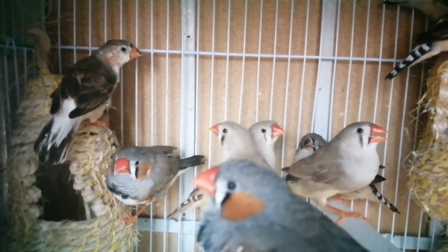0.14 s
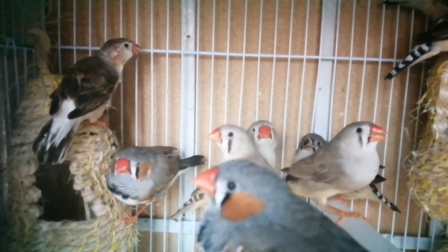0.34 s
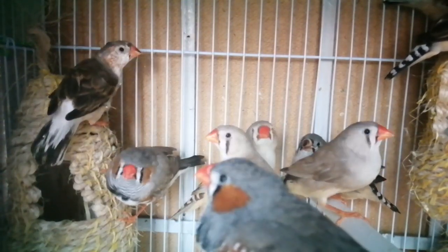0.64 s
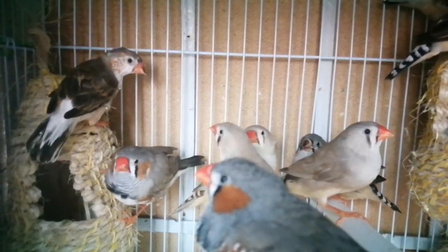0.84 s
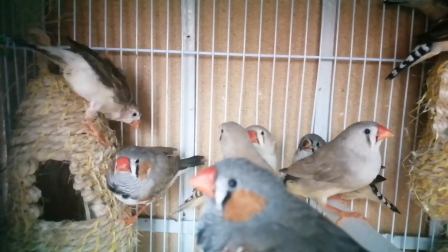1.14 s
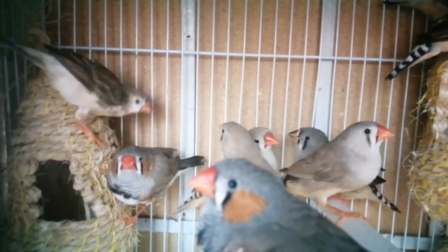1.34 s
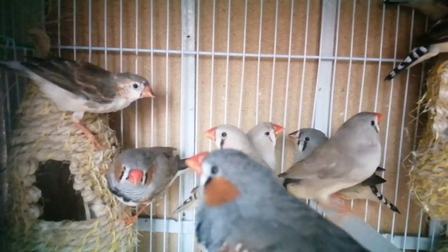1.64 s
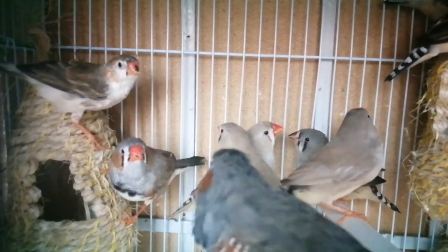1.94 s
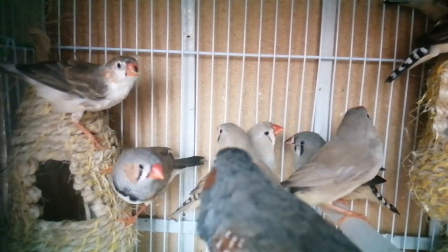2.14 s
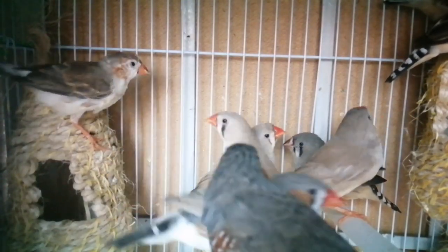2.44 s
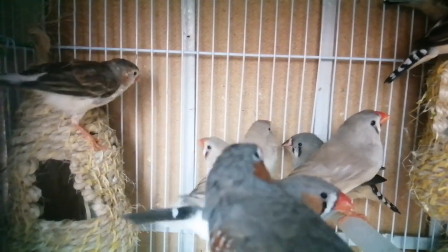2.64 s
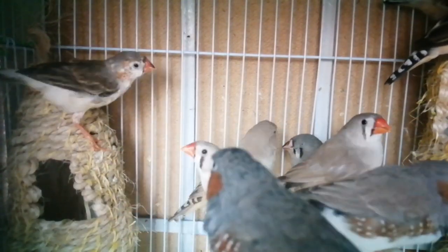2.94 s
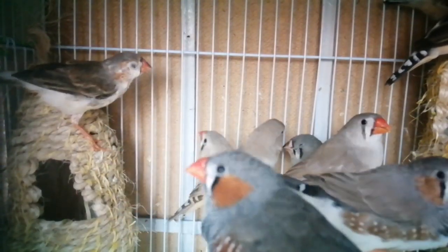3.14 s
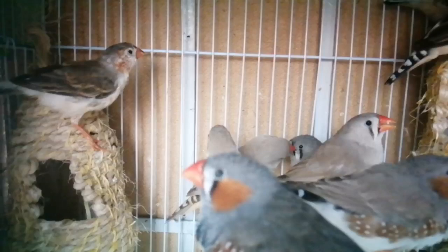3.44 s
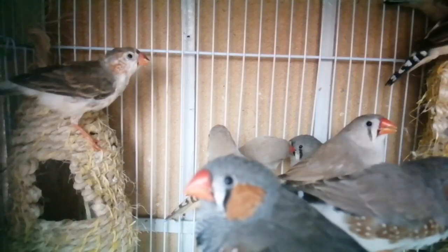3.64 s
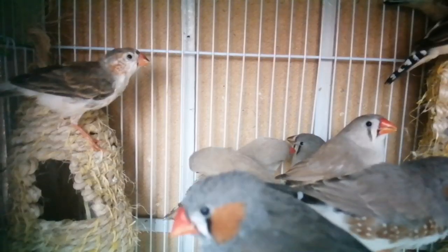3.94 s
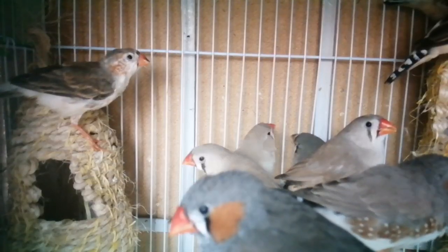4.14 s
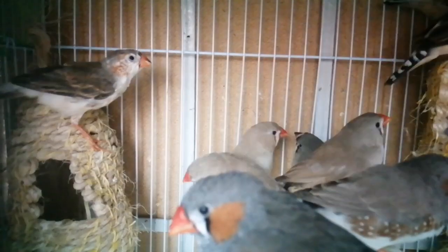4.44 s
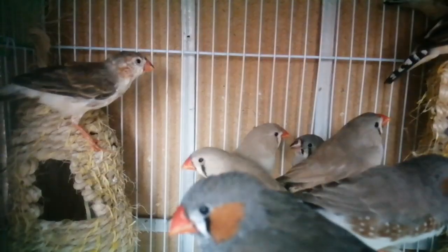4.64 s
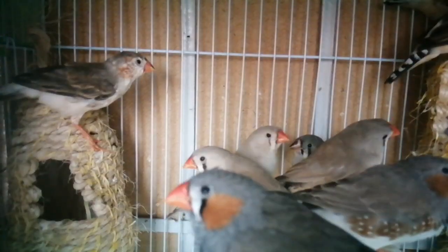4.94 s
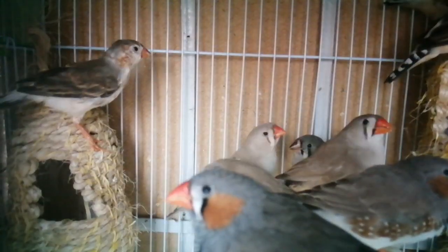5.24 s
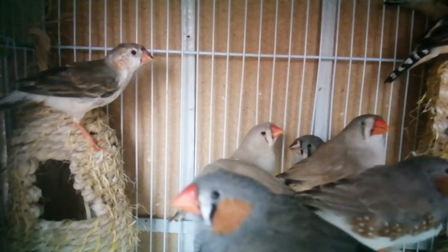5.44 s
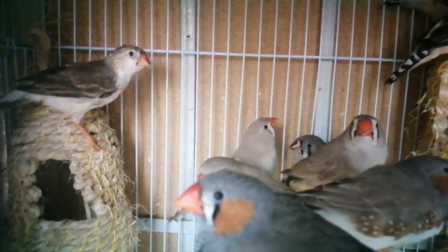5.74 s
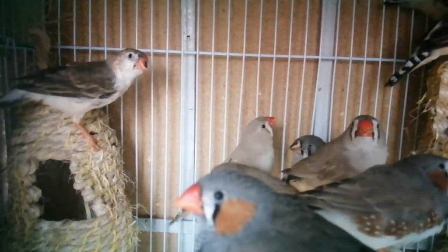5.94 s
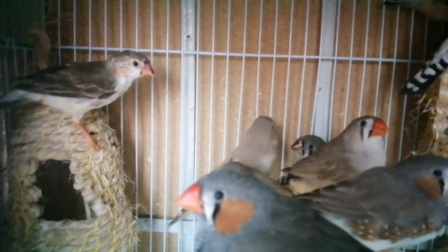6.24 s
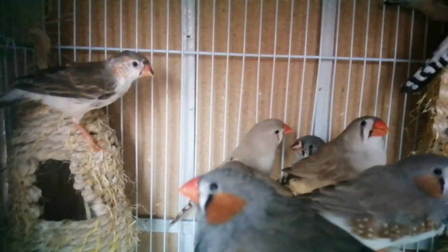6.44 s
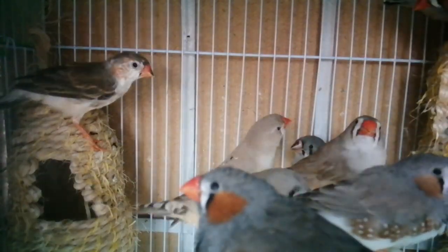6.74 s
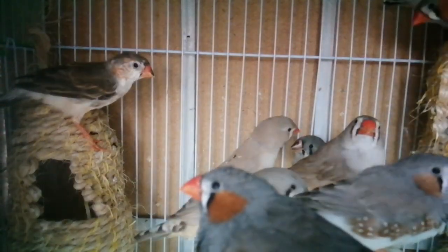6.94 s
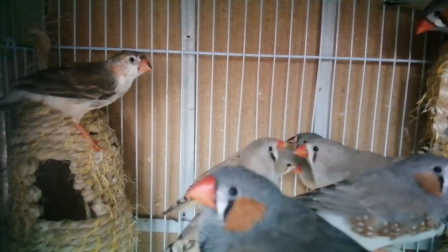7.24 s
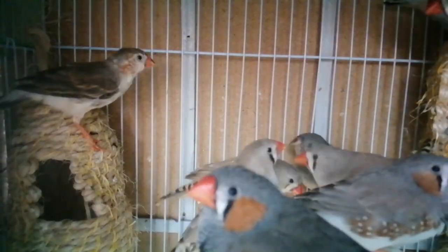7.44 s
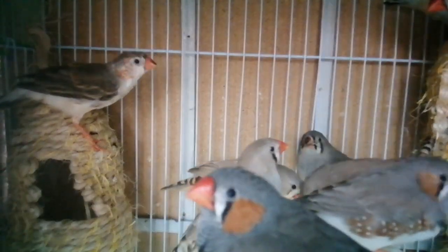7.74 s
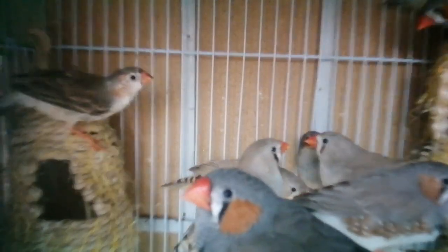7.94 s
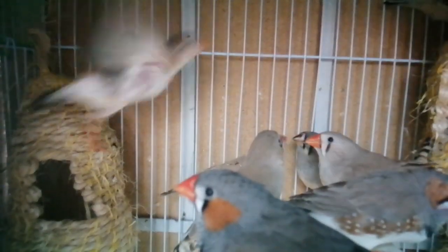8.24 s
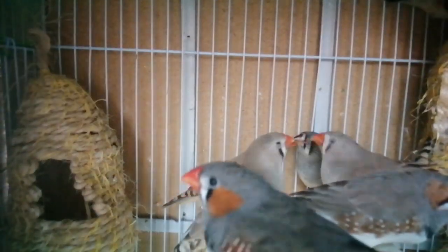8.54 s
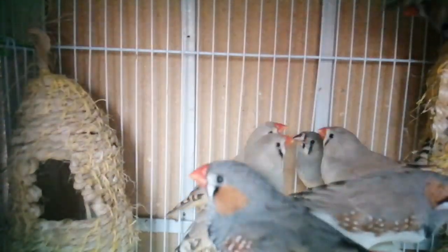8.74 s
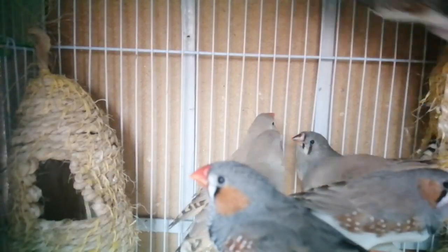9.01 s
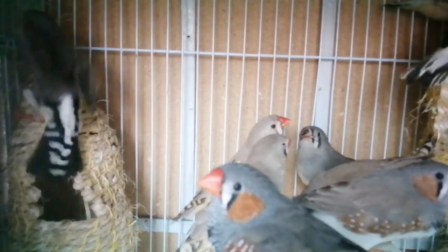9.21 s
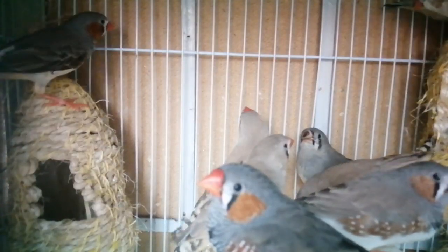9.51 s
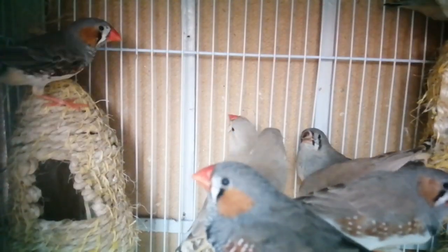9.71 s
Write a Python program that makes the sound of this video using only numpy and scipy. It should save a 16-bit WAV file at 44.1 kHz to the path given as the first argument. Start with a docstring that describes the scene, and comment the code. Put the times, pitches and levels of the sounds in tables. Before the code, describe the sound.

Small finches call in a wire cage, close to the microphone, over a dull outdoor rumble and a low, wavering motor hum. Farther birds peep faintly throughout. At 0.35 seconds a loud, sharp chip starts a high, quick trill of about twelve notes, sinking slightly in pitch until 1.6. Several softer, short nasal calls follow from 1.4 to 2.9. Around 3.6 the hum swells and the close bird gives a chip and a brief up-and-down whistle. Claws scratch sharply on a perch at 3.8 and 4.0. A quieter stretch holds light feather brushes and a dull board knock at 5.4. Two loud chips at 6.8 lead into a second trill, falling and fading by 8.1, with a sharp claw scratch at 7.6 and a soft knock near 8. Light claw ticks and feather rustles continue until almost 10 seconds.

```python
"""Finches trill, chip and call in a wire cage with a board back. One close bird trills twice and whistles;
each trill syllable comes from the two sides of its syrinx. Its mates give nasal calls, partials shaped by
throat and beak; farther birds sweep and peep. Claws tick on perch and wire, feathers brush, the board
knocks. A motor hums in a dull outdoor rumble. The recorder turns its gain down under the loudest calls."""
import sys
import numpy as np
from scipy import signal
from scipy.fft import rfft, irfft, next_fast_len
from scipy.io import wavfile
from scipy.ndimage import uniform_filter1d

SR = 44100
rng = np.random.default_rng(int(sys.argv[2]) if len(sys.argv) > 2 else 0)


def master(y):
    """Save y as 16-bit WAV."""
    cut = np.clip(np.atleast_2d(y).T, -1, 1)
    pcm = np.round(cut * 32767)  # scale
    wavfile.write(sys.argv[1], SR, pcm.astype(np.int16))


N = 435266

# outdoor rumble, also the puff of a touch: f/Hz, density/dB
RUMBLE_SPECTRUM = [(12, -40), (20, -18), (43, 1.5), (195, -7.5), (242, -8), (380, -13.5), (642, -15.5),
                   (955, -19), (1500, -22.5), (1950, -67.5), (3300, -120)]


def near_birds():
    """One bird trills in two overlapping voices and whistles; it and a neighbour give short rising chips."""
    # trill syllables: t/s, lower voice f/Hz, level/dB
    syllables = [(0.4298, 5540, 6.5), (.523, 5580, 4.5), (0.6192, 5476, 5), (0.714, 5436, 2.5),
                 (.812, 5340, 1.5), (.911, 5340, 2), (1.015, 5230, 3), (1.115, 5210, 3), (1.218, 5274, 1),
                 (1.32, 5180, 2), (1.422, 5090, 1), (1.541, 5046, 6), (6.937, 5313, 3), (7.036, 5455, 2.5),
                 (7.129, 5290, 4.5), (7.225, 5410, 2.5), (7.325, 5310, 1), (7.424, 5310, 0),
                 (7.525, 5270, 0), (7.63, 5170, -1.5), (7.738, 5180, -2.5), (7.842, 5070, -5.5),
                 (7.953, 4866, -8), (8.07, 4870, -10.5)]
    # single chips of both birds: t/s, level/dB, end f/Hz, pan/dB, length/s
    chips = [(0.346, 17.5, 5384, 1, 0.019), (0.358, 0.5, 6350, 3.5, 0.028), (0.966, -8.5, 6220, 11, 0.05),
             (1.509, -5.5, 6360, 3, 0.026), (1.601, 0.5, 6130, 4, 0.026), (1.699, -4.5, 6110, 7.5, 0.025),
             (1.789, -4.5, 5810, 0.5, 0.036), (1.908, -4, 5640, 6, 0.023), (3.625, 5, 5540, -2, 0.025),
             (6.779, 11.5, 5150, -3, 0.04), (6.857, 10.5, 5100, 1, 0.038)]
    # whistle contour: t/s, f/Hz, level/dB
    whistle = [(3.637, 4670, -8.5), (3.661, 4780, -1.5), (3.67, 4930, 2.5), (3.688, 6020, -3),
               (3.706, 6074, 4.5), (3.719, 5970, -9.5), (3.727, 5230, -5.5), (3.742, 4910, -6.5),
               (3.75, 5200, -2), (3.759, 5900, -3.5), (3.767, 5920, -2.5), (3.774, 5920, -26.5)]
    # partials of each voice: multiple of pitch, level/dB
    upper_partials = [(.5, -25), (1, 0), (1.5, -14), (2, -9), (2.5, -25)]
    lower_partials = [(.5, -43.5), (1, -3), (2, -17)]
    whistle_partials = [(.5, -21.5), (1, -2), (1.5, -17), (2, -15.5)]
    out = np.zeros((2, N))
    for s, low_hz, db in syllables:
        hz, shape = rising_note(1.115 * low_hz, 0.031, dip=rng.uniform(0.05, 0.132),
                                rise_s=0.00303, swell=0.9, edge=0.7)
        upper = syrinx(hz, amp(db - 12) * shape, upper_partials, pan_db=3, rough=0.33, broken=0.17)
        add(out, s - 0.004, upper)
        hz, shape = rising_note(1.008 * low_hz, rng.uniform(0.033, 0.034), dip=rng.uniform(0.1, 0.2),
                                rise_s=0.00307, swell=1.36, edge=0.39)
        hz = hz * np.linspace(0.99, 1.01, len(hz))
        lower = syrinx(hz, amp(db - 5) * shape, lower_partials, pan_db=6.5, rough=0.07, broken=0.5)
        add(out, s + 0.012, lower)
    for s, db, end_hz, pan_db, length_s in chips:
        high = end_hz > 5400
        partials, rough, rise_s = (upper_partials, 0.19, 0.003) if high else (lower_partials, 0.11, 0.007)
        hz, shape = rising_note(end_hz, length_s, dip=0.14, rise_s=rise_s, swell=0.73, edge=0.83)
        add(out, s - 0.002, syrinx(hz, amp(db - 9.5) * shape, partials, pan_db, rough, broken=0.48))
    s, hz, db = np.transpose(whistle)
    t = np.arange(s[0], s[-1], 1 / SR)
    rough = np.interp(t, [3.715, 3.725], [0.03, 0.09])   # fall and second rise are hoarser
    glide_hz = uniform_filter1d(np.interp(t, s, hz), size=300)
    level = np.minimum(1, (t - s[0]) / 0.0032) * amp(np.interp(t, s, db))
    add(out, s[0], syrinx(glide_hz, level, whistle_partials, pan_db=1.4, rough=rough, broken=rough))
    return out


def syrinx(hz, level, partials, pan_db, rough, broken):
    """One side of the syrinx: rough shakes pitch and level fast, broken makes it swell and drop out."""
    n = len(hz)
    shaken_hz = hz * (1 + 0.06 * rough * drift(550, n))
    phase = 2 * np.pi * (np.cumsum(shaken_hz) / SR + rng.random())
    flutter = 0.5 + 2.6 * rough * drift(350, n)
    level = level * rms_one(flutter * (1 + broken * drift(73.7, n)))
    out = 0
    for k, db in partials:
        lead_rad = rng.normal(1.59, 0.51 * k)   # phase between the two microphone ports
        out = out + panned(level * amp(db), pan_db) * np.sin(k * phase + [[0], [lead_rad]])
    return out


def rising_note(hz, length_s, dip, rise_s, swell, edge):
    """Pitch climbing towards hz, and its envelope; more swell delays the top, more edge softens the ends."""
    t = np.arange(int(length_s * SR)) / SR
    return hz * (1 - dip * np.exp(-t / rise_s)), np.sin(np.pi * (t / length_s) ** swell) ** edge


def nasal_calls():
    """Arched stacks of partials, strongest near the throat and beak resonances; the lowest hardly radiate."""
    # calls: t/s, length/s, top f/Hz, start dip/0-1, end dip/0-1, level/dB, throat f/Hz, throat width/Hz,
    # partials below throat/dB, beak re throat/dB, pan/dB, roughness/0-1
    calls = [(1.412, 0.13, 684, 0.2, 0.09, -33.5, 2960, 380, -21.5, -3, -2, 0.44),
             (1.797, 0.1, 675, 0.3, 0.05, -25, 3600, 710, -27, 4, -8.5, 0.13),
             (1.95, 0.115, 659, 0.3, 0.05, -17.5, 4000, 900, -30, 7, -3, 0.35),
             (1.97, 0.11, 705, 0.2, 0.08, -23, 2800, 398, -17, -9.5, 1.5, 0),
             (2.071, 0.12, 693, 0.06, 0.1, -23.5, 3080, 400, -17, -40, -0.5, 0.09),
             (2.266, 0.1, 648, 0.15, 0.06, -17.5, 4150, 1100, -32, 4, -1.5, 0.16),
             (2.667, 0.2, 699, 0.14, 0.06, -22.5, 2865, 384, -12.5, -20, 5, 0.09),
             (6.671, 0.069, 531, 0.04, 0.06, -30.5, 2780, 600, -30, -20, -3, 0.16)]
    beak_hz, beak_width_hz, rolloff_hz = 5070, 380, 5900
    k = np.arange(1, 24)[:, None]
    out = np.zeros((2, N))
    for (s, length_s, top_hz, start_dip, end_dip, db,
         throat_hz, width_hz, low_db, beak_db, pan_db, rough) in calls:
        n = int(length_s * SR)
        t = np.arange(n) / SR
        along = t / length_s
        arch = 1 - start_dip * np.exp(-(t / 0.024) ** 1.6) - end_dip * along ** 3.9
        hz = k * top_hz * arch * (1 + (0.0022 + 0.01 * rough) * drift(250, n))   # a row per partial
        opening = 1 + 0.08 * np.exp(-t / 0.029) + 0.12 * along ** 3   # throat rings higher at both ends
        throat = 1 / np.hypot(1, 2 * (hz - throat_hz * opening) / width_hz) ** 1.62
        throat += amp(low_db) * (hz / throat_hz) / (1 + (hz / throat_hz) ** 6)
        beak = amp(beak_db) / np.hypot(1, 2 * (hz - beak_hz) / beak_width_hz)
        floor = amp(-31.5 + 16 * rough + beak_db / 2)
        wander_db = 2.6 * np.array([drift(13.2, n) for _ in k])
        gains = ((throat + beak) / (1 + (hz / rolloff_hz) ** 14) + floor) * amp(wander_db)
        ends = 1 + 2.1 * np.exp(-t / 0.015) + 2.1 * along ** 8
        hoarse = 1.2 * rough * ends * np.minimum((k / 7) ** 1.2, 3)
        rasp = (1 + hoarse * np.array([drift(500, n) for _ in k])) / np.sqrt(1 + hoarse ** 2)
        gains = gains / np.sqrt(np.sum(gains ** 2, axis=0) / 2) * (k > 1) * rasp
        phases = 2 * np.pi * np.cumsum(hz, axis=1) / SR + 6 * rng.random(k.shape)
        leads_rad = 0, rng.normal(1.78, 1, k.shape)
        stack = [np.sum(gains * np.sin(phases + lead), axis=0) for lead in leads_rad]
        shape = np.sin(np.pi * along ** 1.75) ** 0.19
        add(out, s, panned(shape * amp(db), pan_db) * stack)
    return out


def far_birds():
    """Short broken sweeps and peeps with a weak octave, panned at random; faint chatter at chance times."""
    # falling sweeps and slightly rising peeps: t/s, length/s, start f/Hz, level/dB
    sweeps = [(.005, 0.035, 3065, -48.5), (.184, 0.043, 3620, -52.5), (2.426, 0.032, 3260, -41),
              (2.472, 0.014, 4220, -41), (2.486, 0.055, 3925, -41), (2.516, 0.024, 3700, -50),
              (2.728, 0.048, 5740, -47), (2.991, 0.033, 3860, -49), (3.045, 0.02, 3610, -47),
              (3.085, 0.026, 2640, -47.5), (.49, 0.0204, 2930, -52), (.535, 0.0214, 2973, -59),
              (1.145, 0.015, 3450, -40), (1.275, 0.017, 2850, -50), (6.72, 0.035, 4250, -56),
              (6.86, 0.025, 3070, -42), (6.6, 0.024, 3210, -57), (3.191, 0.037, 4338, -46.5),
              (3.257, 0.043, 3450, -48.5), (3.895, 0.038, 3230, -44), (4.343, 0.062, 3740, -54),
              (4.513, 0.067, 3670, -61), (4.544, 0.06, 5720, -51.5), (4.6, 0.053, 3080, -52.5),
              (4.804, 0.028, 3770, -50), (4.883, 0.04, 3140, -53), (5.002, 0.018, 3880, -50),
              (5.055, 0.049, 4140, -52.5), (5.248, 0.02, 4030, -58), (5.665, 0.03, 5300, -55.5),
              (5.71, 0.02, 3900, -54), (5.919, 0.045, 5080, -54), (6.544, 0.037, 4900, -44.5),
              (9.041, 0.016, 3385, -56.5), (9.157, 0.042, 3615, -56.5), (9.342, 0.039, 3192, -54.5),
              (9.679, 0.042, 4680, -52.5), (9.723, 0.051, 3736, -50.5)]
    peeps = [(.579, 0.06, 2580, -46), (.878, 0.051, 2640, -45), (.974, 0.025, 3200, -41.5),
             (1.61, 0.028, 3070, -35.5), (1.658, 0.047, 2780, -37.5), (.42, 0.041, 3230, -39.5),
             (1.06, 0.045, 3200, -46), (2.735, .018, 2510, -41), (2.787, 0.017, 3210, -40),
             (3.058, 0.023, 2680, -50), (3.87, 0.024, 3010, -41), (5.535, 0.016, 2200, -59),
             (5.74, 0.027, 2035, -60), (6.085, 0.03, 2350, -60), (6.94, 0.025, 3065, -44),
             (7.27, 0.05, 2977, -53), (2.209, 0.058, 2910, -55), (3.59, 0.021, 3390, -51.5),
             (4.266, 0.044, 3570, -58), (5.11, 0.038, 2410, -56), (5.311, 0.022, 2790, -52),
             (6.026, 0.015, 2366, -51), (6.063, 0.013, 3140, -50.5), (6.208, 0.0334, 4000, -49),
             (6.388, 0.023, 2670, -51), (6.557, 0.015, 3220, -43), (8.834, 0.045, 2570, -63),
             (9.047, 0.067, 2505, -61), (9.368, 0.099, 2420, -61), (9.822, 0.05, 4020, -54.5)]
    chatter = rng.uniform([0, 0.02, 2500, -60.5], [N / SR, 0.055, 3900, -49], (10, 4))   # same columns
    out = np.zeros((2, N))
    for notes, mean_oct_per_s in (sweeps, -11.5), (peeps, 1.6), (chatter, -6.9):
        for s, length_s, start_hz, db in notes:
            along = np.arange(int(length_s * SR)) / (length_s * SR)
            hz = start_hz * 2 ** (mean_oct_per_s * length_s * (1 - (1 - along) ** 1.5))
            level = amp(db) * np.sin(np.pi * along) ** 0.5
            add(out, s, syrinx(hz, level, partials=[(1, 11.25), (2, -9)], pan_db=rng.normal(0.9, 3.6),
                               rough=0.24, broken=0.59))
    return out


def claws_and_feathers():
    """Each touch opens a burst of grainy noise with a low puff; feathers add more treble than claws."""
    # claws on perch and wire, feathers on wire and straw: t/s, level/dB, first-contact sharpness/dB
    claws = [(3.8034, -14, -16), (4.0194, -21.5, -6), (4.15, -31.5, 2), (4.2026, -40, 6), (4.2394, -44, 8),
             (5.3904, -39.5, 3), (5.9309, -40, -7), (5.9853, -41.5, -5), (7.645, -14, -1),
             (8.1656, -33.5, 6), (8.1847, -36.5, 10), (8.3509, -34, 8), (8.377, -34, 7), (8.394, -41, -2),
             (8.5178, -31, 16.5), (8.6633, -40.5, 7), (9.515, -34.5, -13), (9.824, -39, -14)]
    brushes = [(.053, -33.5, -3), (2.585, -38.5, 2), (2.63, -41, -25), (3.28, -50, -5), (3.37, -54, 1),
               (3.4394, -43.5, -6), (3.9923, -41, 2), (4.475, -52, 5), (4.635, -50.5, 9),
               (6.117, -47.5, 19), (6.2096, -46.5, 8), (8.742, -56.5, 11), (8.836, -44, -7), (8.87, -58, 8),
               (9.1403, -42, 2.5), (9.1704, -42, 2), (9.192, -45, 4.5), (9.2128, -50, 20),
               (9.2451, -42, 12), (9.3187, -41, -2)]
    # contact noise: f/Hz, density/dB
    contact_spectrum = [(1180, -11.5), (2000, -11), (3400, -5), (3840, -14.5), (4610, -1.5), (5680, -1.5),
                        (7570, -9.5), (12400, -8), (14800, -11), (16000, -24)]
    grain = stereo_noise(contact_spectrum, likeness_share=0.5) * amp(1.7 * drift(630) + 1.85 * drift(54))
    puff = rms_one(butter(stereo_noise(RUMBLE_SPECTRUM), 2, 350, "high"))
    body = rms_one(butter(grain, 4, 7200, "low")) + amp(-13.5) * puff
    treble = rms_one(butter(grain, 4, 7200, "high"))
    out, t = np.zeros((2, N)), np.arange(SR // 4) / SR
    for touches, t60_s, treble_db in (claws, 0.33, -28), (brushes, 0.44, -5.5):
        noise = body + amp(treble_db) * treble
        for s, db, sharp_db in touches:
            i = round(s * SR)
            attack = np.minimum(1, t * amp(sharp_db) / 0.0014)
            crack = 1 + amp(sharp_db) * np.exp(-t / 0.0082)
            shape = (amp(db - 12 - 60 * t / t60_s) * crack * attack)[:N - i]
            add(out, s, panned(shape, rng.normal(1, 3.5)) * noise[:, i:i + len(shape)])
    return out


def board_knocks():
    """A short shaky push rings the modes of the board and rustles the straw."""
    # dull knocks: t/s, level/dB
    knocks = [(4.033, -43.5), (5.395, -28), (7.972, -32.5)]
    # board modes: f/Hz, level/dB, t60/s
    modes = [(95, -8, 0.06), (222, 2, 0.06), (330, -1, 0.03), (428, -1, 0.055), (720, -6, 0.025)]
    push, t, ring = np.zeros((2, N)), np.arange(SR // 4) / SR, 0
    for s, db in knocks:
        shape = amp(db - 30 - 60 * t / 0.5) * np.minimum(1, 0.51 + t / 0.031)
        shake = rng.standard_normal(len(t)) + 1.9 * rng.standard_normal((2, len(t)))
        add(push, s, shape * shake)
    push += 1e-18   # avoids denormals
    for hz, db, t60_s in modes:
        r, w = amp(-60 / (t60_s * SR)), 2 * np.pi * hz / SR
        ring = ring + amp(db) * signal.lfilter([0, np.sin(w)], [1, -2 * r * np.cos(w), r * r], push)
    rustle = butter(push, 2, [500, 1100], "band")
    return ring + amp(28.5) * rustle


def background():
    """Outdoor rumble, a wavering motor hum on two orders, and faint air."""
    # surroundings: t/s, rumble level/dB, hum level/dB, rumble pan/dB
    levels = [(0, -49.5, -36.5, 8.5), (1.3, -52.5, -52, 4), (2.5, -42, -34, 2), (3.58, -43, -24.5, 7),
              (3.8, -46.5, -41, 0.5), (5.5, -46.5, -44, -4.5), (7, -47.5, -49.5, 7), (8.1, -46, -60, 4),
              (9.87, -49, -42, 5)]
    # air: f/Hz, density/dB
    air_spectrum = [(410, -23.5), (700, -13), (1420, -5.5), (1680, 6), (2630, 1), (4050, -14.5),
                    (5400, -6.5), (8990, -17.5), (13700, -26.5), (14800, -21), (16000, -47)]
    motor_hz = 34.53
    s, *columns = np.transpose(levels)
    rumble_db, hum_db, pan_db = [np.interp(np.arange(N) / SR, s, c) for c in columns]
    phase = 2 * np.pi * np.cumsum(motor_hz * (1 + 0.0074 * drift(1.525))) / SR
    hum = amp(-12 + 1.4 * drift(2.2)) * np.sin(phase) + amp(-8.5 + 1.8 * drift(3.8)) * np.sin(2 * phase)
    rumble = stereo_noise(RUMBLE_SPECTRUM) * panned(amp(rumble_db + 3.5 + 2 * drift(9.98)), pan_db)
    air = stereo_noise(air_spectrum) * amp(rumble_db - 9 + 2.2 * drift(13.1))
    return rumble + amp(hum_db) * panned(hum, 7.9) + air


def cage_echoes(x, echo_db, tail_db, t60_s):
    """Close echoes from board and nests, other ones at each microphone, then a diffuse tail."""
    t = np.arange(SR // 2) / SR
    tail = rng.standard_normal((2, len(t))) * amp(-60 * t / t60_s) * np.minimum(1, t / 0.0019)
    tail = butter(tail, 2, 13700, "low")   # straw and feathers swallow the treble
    response = amp(tail_db) * tail / np.linalg.norm(tail, axis=1, keepdims=True)
    lags_s = np.array([[0.0011, 0.0027, 0.0066, 0.0094], [0.0016, 0.0035, 0.007, 0.014]])
    for channel, lags in enumerate((lags_s * SR).astype(int)):
        response[channel, lags] += amp(echo_db - 0.5 * np.arange(4)) * [1, -1, 1, -1]
    response[:, 0] = 1   # direct sound
    response /= np.linalg.norm(response, axis=1, keepdims=True)
    return signal.fftconvolve(x, response, axes=1)[:, :N]


def housing(x):
    """Cage and microphone housing colour the voices; each port has its own response."""
    # response: f/Hz, gain/dB, pan/dB
    response = [(1005, -5.5, -2), (3350, 4, -0.5), (4350, -1, 3.5), (6040, 5.5, 3), (6070, 0.5, -2.5),
                (7600, 1.5, -2.5), (9470, -1.5, -22), (10900, -7, -10.5), (14400, -6.5, 0.5)]
    size, hz = fft_grid()
    gains = panned(amp(at_hz(response, hz)), at_hz(response, hz, column=2))
    return irfft(rfft(x, size) * gains, size)[:, :N]


def gain_control(x):
    """Level over the threshold is cut just ahead and let go steadily; long loud passages hold it longer."""
    threshold_db, ahead = -21.5, round(0.0026 * SR)
    level_db = 10 * np.log10(smooth(np.mean(x ** 2, axis=0), 0.0022) + 1e-12)
    over_db = np.maximum(level_db - threshold_db, 0)
    ramp_db = 73 * np.arange(N) / SR
    held_db = np.maximum.accumulate(over_db + ramp_db) - ramp_db   # peak hold, falling 73 dB/s
    cut_db = 0.7 * smooth(held_db, time_s=0.0014) + 0.23 * smooth(held_db, time_s=1)
    return x * amp(-np.pad(cut_db, (0, ahead), "edge")[ahead:])


def stereo_noise(spectrum, likeness_share=1):
    """Noise of a given spectrum, partly alike in both channels; rms 1."""
    # left-right likeness: f/Hz, correlation/0-1
    likeness = [(60, 1), (240, 0.76), (950, 0.0078), (3770, 0.03), (15000, 0.023)]
    # left-right balance: f/Hz, pan/dB
    balance = [(60, -4), (180, -4.5), (550, -6), (1650, -1), (4970, 5), (15000, -9)]
    size, hz = fft_grid()
    mid, side = rfft(rng.standard_normal((2, size))) * amp(at_hz(spectrum, hz))
    alike = likeness_share * np.clip(at_hz(likeness, hz), 0, 1)
    lean = amp(at_hz(balance, hz) / 2)
    mid, side = mid * np.sqrt(1 + alike), side * np.sqrt(1 - alike)
    return rms_one(irfft([(mid + side) * lean, (mid - side) / lean], size)[:, :N])


def drift(rate_hz, size=N):
    """Noise twice through a one-pole low-pass; rms 1."""
    r = np.exp(-2 * np.pi * rate_hz / SR)
    run_in = int(SR / rate_hz)
    return rms_one(signal.lfilter([1], [1, -2 * r, r * r], rng.standard_normal(size + run_in))[run_in:])


def smooth(x, time_s):
    """One-pole smoothing."""
    r = np.exp(-1 / (time_s * SR))
    return signal.lfilter([1 - r], [1, -r], x)


def butter(x, order, hz, kind):
    """Causal filter with a flat passband."""
    return signal.sosfilt(signal.butter(order, hz, kind, fs=SR, output="sos"), x)


def fft_grid():
    """FFT size and its frequencies, one bin up to avoid 0 Hz."""
    size = next_fast_len(N)
    return size, np.arange(1, size // 2 + 2) * SR / size


def at_hz(points, hz, column=1):
    """Interpolate a table over log frequency."""
    rows = np.array(points)
    return np.interp(np.log(hz), np.log(rows[:, 0] + 1), rows[:, column])


def amp(db):
    """dB to gain."""
    return 10 ** (np.asarray(db) / 20)


def rms_one(x):
    """Scale to rms 1."""
    return x / np.sqrt(np.mean(x ** 2) + 1e-20)


def panned(x, pan_db):
    """Mono to stereo; pan_db is left over right."""
    return np.array([x * amp(pan_db / 2), x * amp(-pan_db / 2)])


def add(out, s, x):
    """Mix x into out from time s."""
    i = max(round(s * SR), 0)
    out[:, i:i + x.shape[1]] += x[:, :N - i]


def scene():
    """Near birds, nasal calls, far birds and cage noises over the background."""
    near = cage_echoes(near_birds(), echo_db=-14.5, tail_db=-15.5, t60_s=0.34)
    mates = cage_echoes(nasal_calls(), echo_db=-42, tail_db=-16, t60_s=0.093)
    far = cage_echoes(far_birds(), echo_db=-13.5, tail_db=-6, t60_s=0.24)
    return housing(near + mates + far) + claws_and_feathers() + board_knocks() + background()


def record(dry):
    """Gain control, then a steep low-pass."""
    stop_hz = 16400
    return signal.sosfilt(signal.cheby2(12, 70, stop_hz, fs=SR, output="sos"), gain_control(dry))


dry = scene()
out = record(dry)
master(out)
```